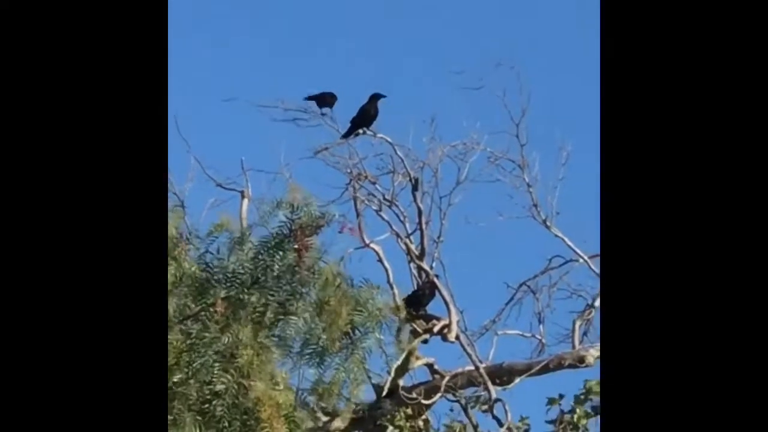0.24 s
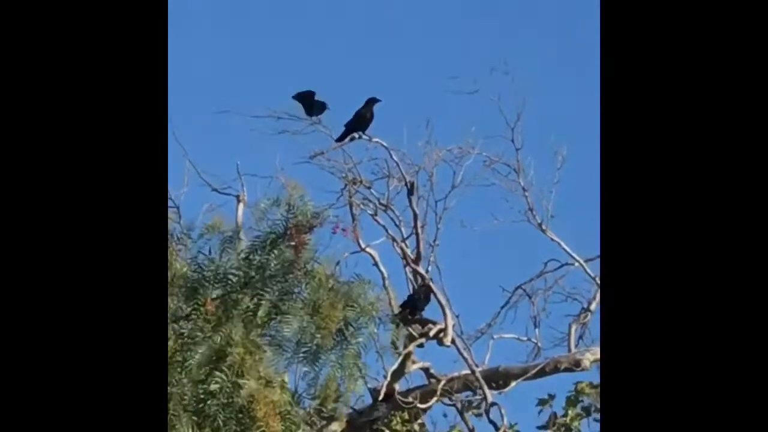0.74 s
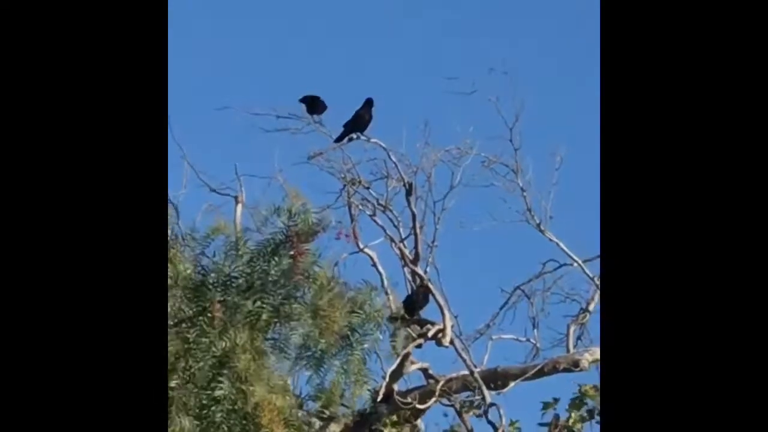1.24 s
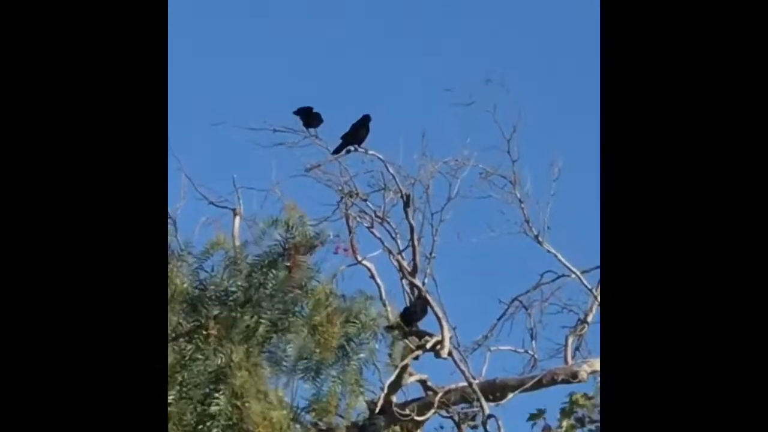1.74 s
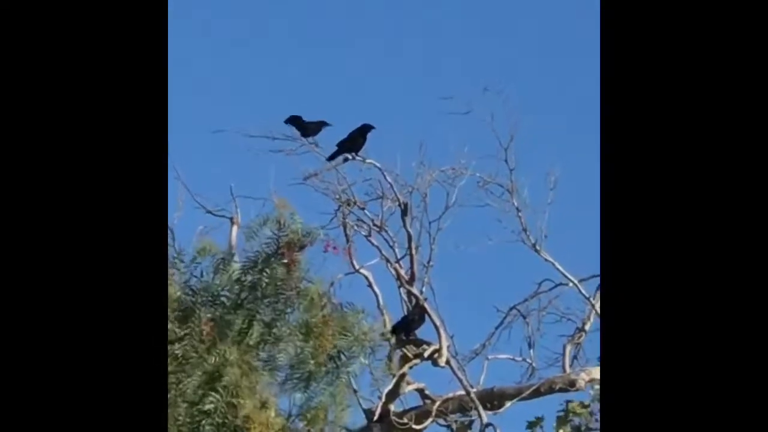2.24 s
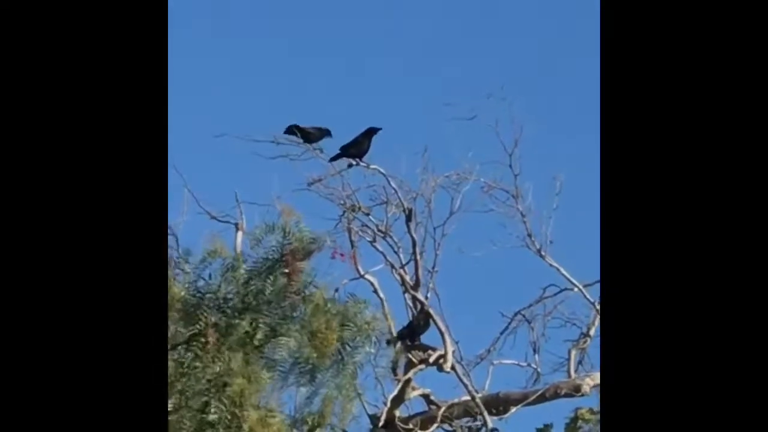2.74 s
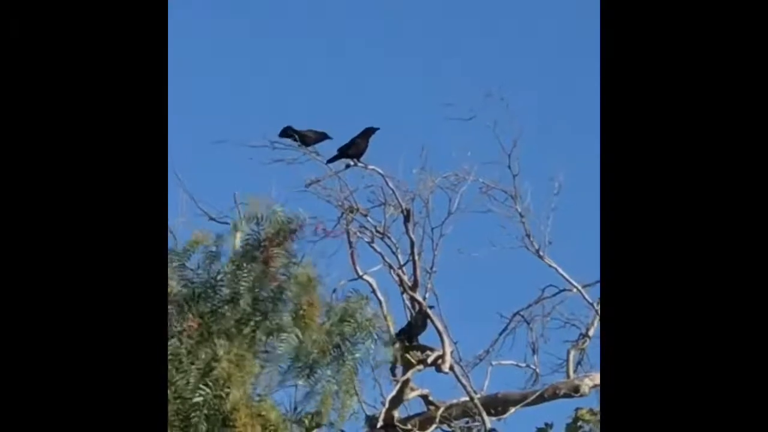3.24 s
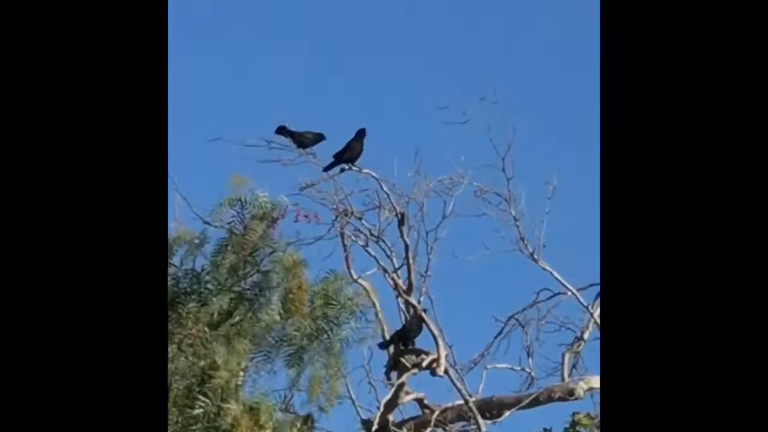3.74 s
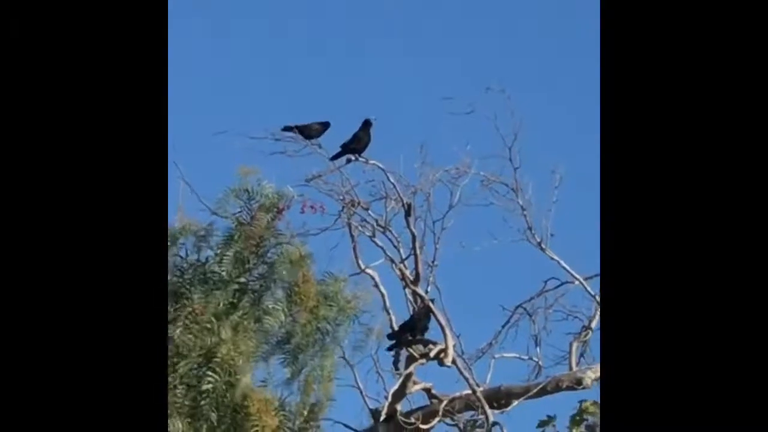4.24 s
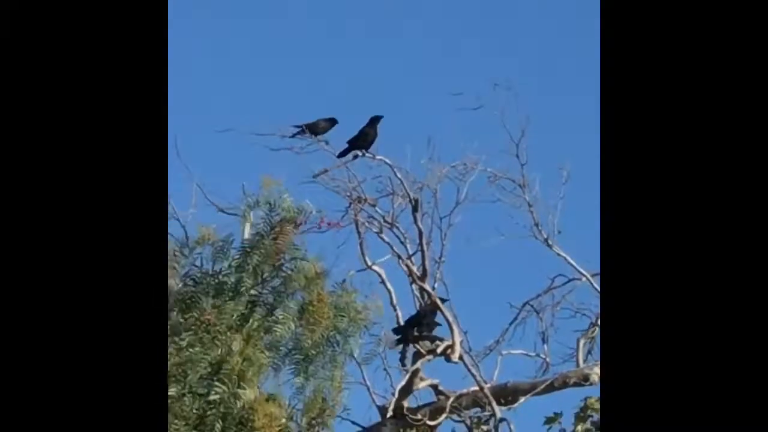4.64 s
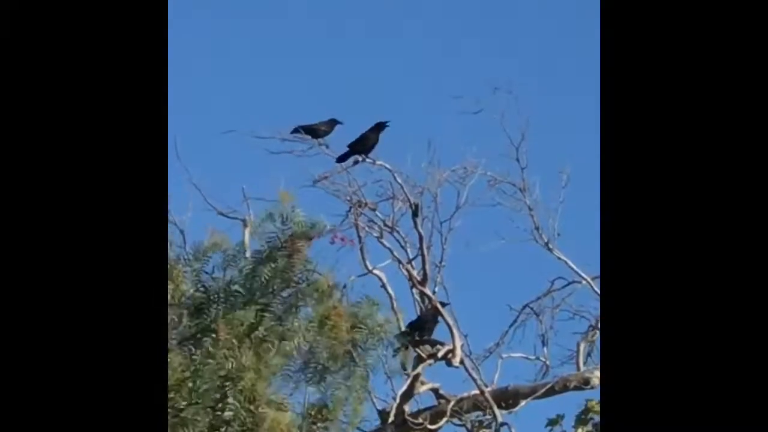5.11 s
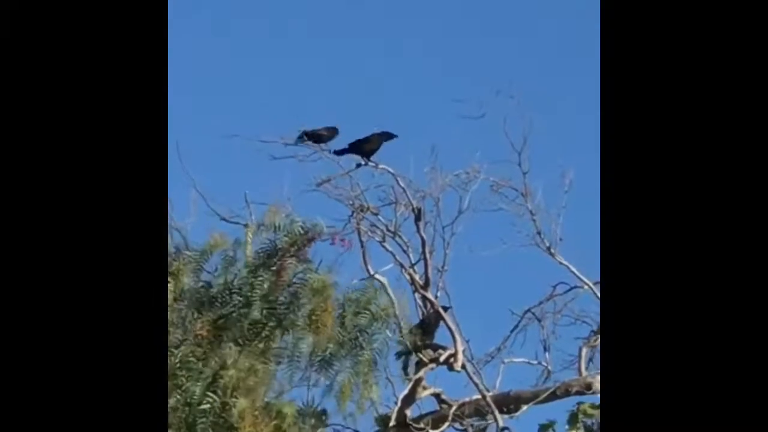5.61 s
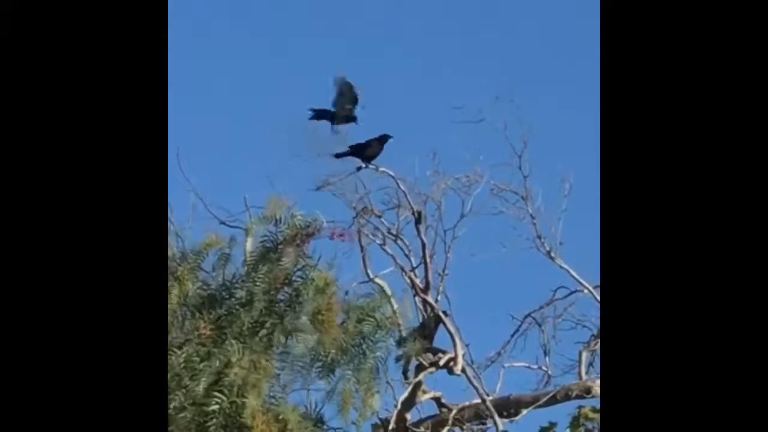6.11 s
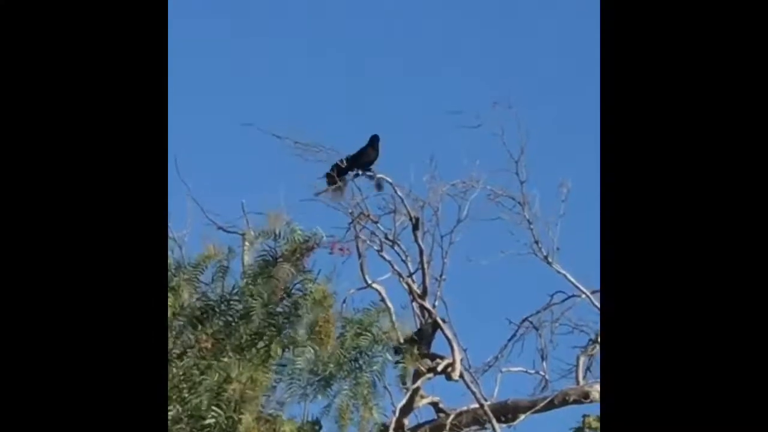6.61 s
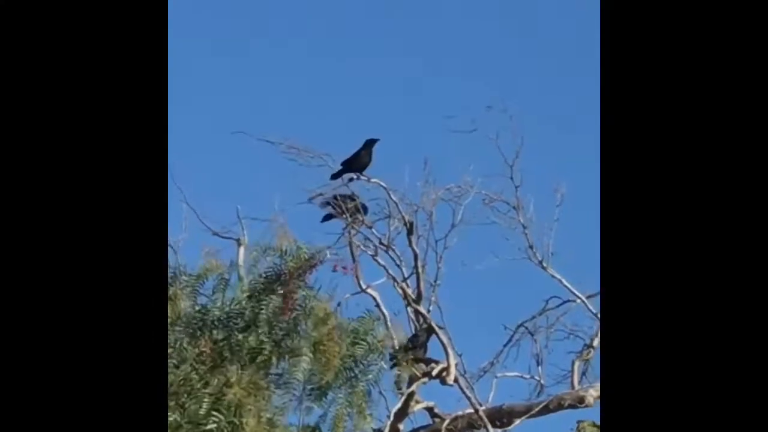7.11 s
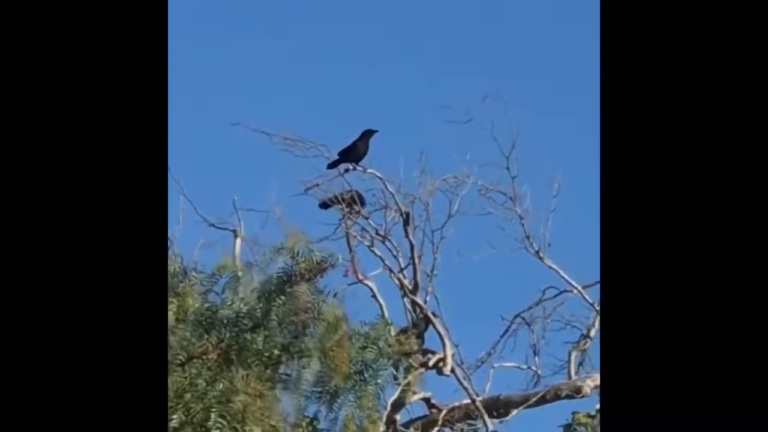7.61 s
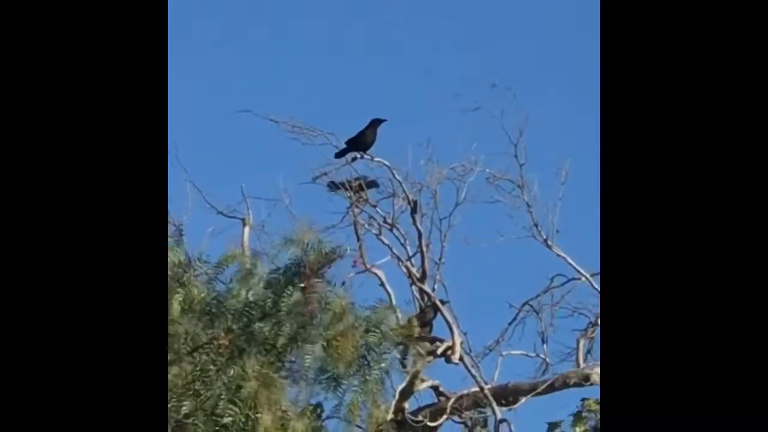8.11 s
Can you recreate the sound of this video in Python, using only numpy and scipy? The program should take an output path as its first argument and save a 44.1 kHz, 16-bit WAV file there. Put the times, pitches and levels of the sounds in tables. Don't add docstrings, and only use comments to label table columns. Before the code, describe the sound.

Outdoors, far crows call softly above rumbling traffic; after five seconds nearer crows caw harshly, wings clap, a rattle call clicks, and wind bumps the microphone.

```python
import sys
import numpy as np
from scipy import signal
from scipy.io import wavfile
from scipy.ndimage import uniform_filter1d

SR = 44100
rng = np.random.default_rng(int(sys.argv[2]) if len(sys.argv) > 2 else 0)


def gain_from_db(level_db):
    decades = np.asarray(level_db, float) / 20
    return 10 ** decades


def wav_out(sig):
    wavfile.write(sys.argv[1], SR, np.round(np.clip(np.atleast_2d(sig).T, -1, 1) * 32767).astype(np.int16))


N = 368676
T = np.arange(N) / SR

# start in seconds, length in seconds, effort in dB, top pitch in Hz, brightness in dB.
FAR_CAWS = [
    (.745, .19, -57, 670, 1),
    (1.11, .195, -56.5, 645, 0.5),
    (1.635, .19, -55.5, 659.4, 0),
    (2.22, .19, -56, 634, 0.5),
]
SHORT_CAWS = [
    (5.21, 0.16, -37, 635.7, 1.5),
    (5.52, 0.16, -37, 653, 0.5),
    (6.33, .195, -39.5, 528.2, -16),
    (7.066, .222, -36, 610.2, 3.5),
    (7.45, .16, -38.5, 639.3, -1),
    (7.8, 0.17, -40.5, 638, -0.5),
    (8.18, 0.17, -39.5, 640.6, -1.5),
]
LONG_CAWS = [
    (6.28, 0.35, -37, 620, 2.1),
    (6.862, .29, -35.5, 602, 0.16),
    (7.44, .38, -38, 598.4, 3),
]
# centre in Hz, width in Hz, level in dB.
NEAR_TRACT = [
    [(620, 550, -19.5), (1413, 400, 10.5), (1907, 450, 0)],
    [(2197, 440, 3.5), (2830, 310, -4), (3356, 490, 2)],
    [(3605, 320, 5.5), (4390, 470, -2.5)],
    [(4950, 1040, 0.5), (6400, 927, 5), (7175, 1200, -2), (8800, 1430, -11), (11500, 1700, -19)],
]
FAR_TRACT = [
    [(1426, 600, 0.83), (1910, 530, 1)],
    [(2235, 410, -4.5), (3240, 830, -6)],
    [(3680, 430, -9), (4450, 550, -10.5)],
    [(5150, 540, -4), (6140, 1150, 1), (7200, 2500, -11.5), (9000, 2500, -14.5)],
]
# crest and span as shares of the length, bend as exponent, climb and sag of pitch as
# shares, rise and fall of effort in dB, shift as exponent, mouth, beak and rasp in dB at the crest
# (open_db) and their change by the end in dB (end_db).
FAR_VOICE = dict(crest=.35, span=.5, bend=1.6, climb=.08, sag=.08, rise_db=-5, fall_db=-15, shift=1.4, open_db=[-3.5, -8.5, -4.5],
             end_db=[-12, 4, 2])
SHORT_VOICE = dict(crest=.42, span=.48, bend=2.6, climb=.32, sag=.28, rise_db=-13, fall_db=-5.5, shift=3.5, open_db=[-5.5, -10, -7.5],
               end_db=[-10.5, 1, -1])
LONG_VOICE = dict(crest=.27, span=.33, bend=1.5, climb=.28, sag=.3, rise_db=-7.5, fall_db=-8, shift=1.1, open_db=[-11, -18, -19.5],
              end_db=[-5, 11, 3])
# start in seconds, peak in dB.
RATTLE_KNOCKS = [(5.985, -53), (6.0457, -50), (6.105, -49.5), (6.1624, -46.5), (6.2244, -44.5),
                 (6.283, -42), (6.341, -46), (6.4, -49), (6.4597, -52), (6.6885, -49.5), (6.7497, -46),
                 (6.8088, -48.5), (6.868, -47)]
# centre in Hz, width in Hz, level in dB.
RATTLE_TRACT = [(1117.4, 180, 9.5), (1950, 800, -7), (4482, 92, 4.5), (6400, 470, 0), (7070, 460, 4),
                (7840, 580, -4), (9000, 630, -5), (11700, 2700, -14)]
# start in seconds, peak in dB, pitch in Hz.
WING_CLAPS = [(5.883, -43, 1410), (5.886, -47, 2148), (5.901, -43, 1300), (5.904, -43, 1610),
              (5.906, -43, 2240), (5.921, -41, 1500), (5.925, -45, 2150), (5.929, -47, 1670),
              (5.939, -46, 1870), (6.146, -45, 2000), (6.147, -53, 2700)]
# start in seconds, peak in dB, pitch in Hz, 60 dB decay in seconds.
TICKS = [
    (1.494, -41, 2300, .028),
    (1.494, -42.5, 6400, 0.011),
    (1.495, -54, 4200, .02),
    (1.511, -54, 5500, .0065),
    (1.538, -43.5, 1520, 0.017),
    (1.538, -50, 2315, .015),
    (1.548, -59, 2300, .015),
    (7.281, -43.5, 8800, .094),
    (7.283, -54, 8780, 0.24),
    (7.467, -49, 9000, 0.11),
]
# time in seconds, firing rate in Hz, first order in dB, share in plain line 0-1.
ENGINE_COURSE = [(0, 79.83, -41.5, 0), (.8, 80.3, -40, 0), (1.7, 80.1, -34.5, 0.06), (2.1, 80, -34.5, 0.53),
                 (2.6, 80.4, -33, 0.62), (3.25, 79.53, -32, 0.97), (3.8, 78.8, -32, 0.6),
                 (4.15, 80.16, -33.5, .15), (4.8, 79.8, -40, .25), (5.4, 80.04, -40.5, 0.01),
                 (6.1, 80.33, -41, 0.27), (6.6, 80.88, -49.5, 0.04), (7.8, 80.6, -47, .15),
                 (8.36, 81.14, -43, .35)]
# multiple of the firing rate, level hidden in dB, level in plain line in dB.
ENGINE_ORDERS = [(2, -80.5, -49.5), (3, -68.5, -50), (4, -70, -49), (5, -85.5, -61), (6, -89.5, -64.5)]
# centre in Hz, width in Hz, level in dB.
FAN = (119, 5.3, -52)
# peak time in seconds, peak in dB, width in seconds.
GUSTS = [(6.254, -34.5, 0.024), (6.42, -31, 0.055), (6.709, -25, 0.035), (6.785, -32, 0.016),
         (7.0, -31, 0.08), (7.272, -34.5, 0.044), (7.46, -34, 0.045), (7.62, -33, 0.069),
         (7.894, -34.5, 0.058), (8.13, -33.5, 0.047), (8.282, -35, 0.036)]
# time in seconds, peak in dB, pitch in Hz, length in seconds.
EDDIES = [
    (6.388, -22, 69, 0.0092),
    (6.384, -18.5, 140, 0.0015),
    (6.6775, -8, 82, 0.004),
    (6.675, -18.5, 196, 0.0021),
    (6.77, -30.5, 220, 0.0027),
    (7.027, -29, 140, 0.0046),
    (7.865, -31, 110, 0.0086),
]
# time in seconds, leaf hiss in dB, steady buffeting in dB.
BREEZE = [(0, -63.5, -42), (.9, -65, -53.5), (2.5, -66.5, -49), (4.2, -65, -47.5), (5.8, -60.5, -43.5),
          (6.1, -57.5, -48), (6.7, -60, -39.5), (8, -58, -43), (8.36, -62, -52)]
# frequency in Hz, level in dB per Hz.
BUFFET_COLOUR = [(8.8, -34), (15, 3), (49, 4), (66, 0), (97, -17), (162, -15.5), (222, -30), (312, -33),
                 (400, -36.5), (520, -72), (880, -120)]
# frequency in Hz, level in dB per Hz.
ROAR_COLOUR = [(12, -42), (20, -14.5), (59, 0), (86, -13), (105, -7), (188, -17.5), (320, -23), (426, -29),
               (556, -27), (990, -30), (2100, -43), (4000, -46.5), (5200, -76), (8800, -120)]
# frequency in Hz, level in dB per Hz.
HISS_COLOUR = [(880, -5), (1500, -6), (2090, -12), (2750, -11), (3870, -11.5), (4270, -11), (4900, -15),
               (5510, -13), (6770, -15.5), (7680, -18.5), (10700, -21.5), (13700, -24.5), (15700, -34)]

FLUTTER_HZ = 69.27
ONSET_S, RELEASE_S, RELEASE_DB = 0.02, 0.07, -59
SHUT_S, SHUT_DB = 0.015, -12
DRAWN_S = 0.212
FAR_ROUGH, SHORT_ROUGH, LONG_ROUGH = 0.58, 0.45, 0.37
STRAIN_DB, CLEAR_DB, CLEARING = -37, -41, 0.3
NOTE_DB, NOTE_FOLLOW = -45, 0.5
CLAP_T60_S = 0.024
KNOCK_ECHO_DB, TICK_ECHO_DB = -16, -26
BOOM_S, BOOM_RISE_S, BOOM_DB, BOOM_WANDER_DB = 5.95, 0.25, -53.5, 2.5
PASS_S, PASS_WIDTH_S, ROAR_DB, ROAR_SWELL_DB = 3.46, 0.7, -47, 3.5
SWISH_S, SWISH_WIDTH_S, SWISH_DB = 5.858, 0.018, -61.5


def evened(x):
    return x / np.sqrt(np.mean(x ** 2) + 1e-20)


def curve(rows):
    s, *columns = np.transpose(rows)
    return [np.interp(T, s, c) for c in columns]


def bell(s, width_s):
    return np.exp(-0.5 * ((T - s) / width_s) ** 2)


def drift(hz):
    return evened(signal.lfilter(*signal.butter(2, hz, fs=SR), rng.standard_normal(N)))


def noise(colour, patchy_db, size=2048):
    hz = np.fft.rfftfreq(size, 1 / SR)
    point_hz, point_db = np.transpose(colour)
    real, imag, patches = rng.standard_normal((4 * N // size + 5, len(hz), 3)).T
    patches = evened(uniform_filter1d(uniform_filter1d(patches, 16, 0), 8, 1))
    colour_db = np.interp(np.log(hz + 1), np.log(point_hz + 1), point_db, -100, -100)
    spectra = (real + 1j * imag) * gain_from_db(colour_db[:, None] + patchy_db * patches)
    return evened(signal.istft(spectra, nperseg=size, noverlap=3 * size // 4)[1][:N])


def resonate(x, hz, width_hz):
    pole = np.exp((2j * np.pi * hz - np.pi * width_hz) / SR)
    return 2 * signal.lfilter([(1 - abs(pole)) ** 2], [1, -2 * pole, pole ** 2], x).real


def tract(x, modes):
    return sum((-1) ** k * gain_from_db(db) * resonate(x, hz, width_hz) for k, (hz, width_hz, db) in enumerate(modes))


def gesture(caw, crest, span, bend, climb, sag, rise_db, fall_db, shift, open_db, end_db):
    start_s, length_s, db, top_hz, bright_db = caw
    s = np.arange(0, length_s + RELEASE_S, 1 / 200)
    share = s / length_s
    before = np.clip(1 - s / (crest * length_s), 0, 1) ** 2
    late = np.clip((share - crest) / (1 - crest), 0, 1)
    sunk = np.tanh((np.maximum(share - crest, 0) / span) ** bend)
    effort_db = db + rise_db * before + fall_db * late ** 2
    effort_db += RELEASE_DB * np.maximum(s - length_s, 0) / RELEASE_S
    hz = top_hz * (1 - climb * before - sag * sunk)
    shut_db = SHUT_DB * np.clip((s - length_s) / SHUT_S, 0, 1)
    groups_db = [bright_db + a + b * late ** shift + shut_db for a, b in zip(open_db, end_db)]
    return np.transpose([start_s + s, effort_db, hz, db + 0 * s, *groups_db])


def crow(caws, voice, groups, hoarse, flutter, jitter, clearing=0):
    rows = [gesture(c, **(voice if c[1] < DRAWN_S else LONG_VOICE)) for c in caws]
    effort_db, hz, strain_db, *groups_db = curve(np.concatenate(rows))
    gate = 0
    for start_s, length_s, *_ in caws:
        inside_s = np.minimum(T - start_s, start_s + length_s + RELEASE_S - T)
        gate = gate + np.clip(inside_s / ONSET_S, 0, 1)

    glide_hz_per_s = abs(np.gradient(uniform_filter1d(hz, size=1500))) * SR
    clear = np.interp(strain_db, [CLEAR_DB, STRAIN_DB], [1, 0])
    rough = np.clip(hoarse - clearing * clear + glide_hz_per_s / 24000, 0, 0.75)

    beat = 2 * np.pi * np.cumsum(FLUTTER_HZ * (1 + 0.1204 * drift(25.6))) / SR
    wobble = 1 + jitter * rough * drift(150) + 0.018 * np.sin(beat)
    turns = np.cumsum(uniform_filter1d(hz, size=500) * wobble) / SR
    pulses = np.sin(43 * np.pi * turns + 1e-9) / np.sin(np.pi * turns + 1e-9 / 43) - 1
    pulses *= 1 + 0.6 * rough * drift(250)
    puffs = (1.2 + np.exp(-(turns % 1) / 0.32)) * rng.standard_normal(N)
    drive = (1 - rough) * evened(pulses) + 0.7 * rough * evened(puffs)
    drive *= 1 + flutter * np.cos(beat)
    voiced = sum(gain_from_db(db) * evened(tract(drive, g)) for db, g in zip([0] + groups_db, groups))
    return gate * gain_from_db(effort_db) * voiced


def rattle():
    air, low, high = rng.standard_normal(N), np.zeros(N), np.zeros(N)
    for s, db in RATTLE_KNOCKS:
        u = np.maximum(T - s, 0)
        high += gain_from_db(db) * (1 - np.exp(-u / 0.00074)) * np.exp(-u / 0.013)
        low += gain_from_db(NOTE_DB + NOTE_FOLLOW * (db + 54)) * u / 0.0049 * np.exp(1 - u / 0.0059)
    note = low * evened(tract(air, RATTLE_TRACT[:2]))
    rasp = high * evened(tract(air, RATTLE_TRACT[2:]))
    return gain_from_db(-6) * (note + rasp)


def ticks():
    out = np.zeros(N + SR)
    u = np.arange(SR // 2) / SR
    click = 1 - np.exp(-u / 0.000066)
    for s, db, hz, t60_s in TICKS + [(*clap, CLAP_T60_S) for clap in WING_CLAPS]:
        decay = gain_from_db(db - np.minimum(60 * u / t60_s, 200))
        out[round(s * SR):][:len(u)] += decay * np.cos(2 * np.pi * hz * u) * click
    return out[:N]


def yard(x, t60_s, gap_s):
    at = np.arange(round(gap_s * SR), SR // 2, 20)
    taps = np.zeros(SR // 2 + 20)
    signs = rng.choice([-1., 1.], len(at))
    taps[at + rng.integers(0, 20, len(at))] = signs * gain_from_db(-60 * at / SR / t60_s)
    taps = signal.lfilter([1], [1, -0.7], taps)
    return signal.oaconvolve(x, taps / np.linalg.norm(taps))[:N]


def drone():
    hz, first_db, in_line = curve(ENGINE_COURSE)
    phase = 2 * np.pi * np.cumsum(hz * (1 + 0.0037 * drift(2.94))) / SR
    orders = [(0.99, first_db)] + [(k, a + (b - a) * in_line) for k, a, b in ENGINE_ORDERS]
    tones = sum(gain_from_db(db + 0.42 * np.sqrt(k) * drift(5.2)) * np.sin(k * phase) for k, db in orders)
    boom_rise = np.clip((T - BOOM_S) / BOOM_RISE_S, 0, 1)
    tones += gain_from_db(BOOM_DB + BOOM_WANDER_DB * drift(1.38)) * boom_rise * np.sin(2 * phase)
    fan_hz, fan_width_hz, fan_db = FAN
    fan = gain_from_db(fan_db) * evened(resonate(rng.standard_normal(N), fan_hz, fan_width_hz))
    return np.sqrt(2) * tones + fan


def wind():
    push = gain_from_db(curve(BREEZE)[1]) + sum(gain_from_db(db) * bell(s, width_s) for s, db, width_s in GUSTS)
    out = push * gain_from_db(0.94 * drift(35)) * noise(BUFFET_COLOUR, 0.76)
    for s, db, hz, length_s in EDDIES:
        out += gain_from_db(db) * bell(s, length_s) * np.sin(2 * np.pi * hz * (T - s))
    return out


def wash():
    feathers = evened(resonate(rng.standard_normal(N), 10500, 7000))
    swish = gain_from_db(SWISH_DB) * bell(SWISH_S, SWISH_WIDTH_S) * feathers
    roar = gain_from_db(ROAR_DB + ROAR_SWELL_DB * bell(PASS_S, PASS_WIDTH_S)) * noise(ROAR_COLOUR, 0.95)
    hiss = gain_from_db(curve(BREEZE)[0]) * noise(HISS_COLOUR, 1.0, size=1024)
    return roar + hiss + swish


def scene():
    far = crow(FAR_CAWS, FAR_VOICE, FAR_TRACT, FAR_ROUGH, flutter=0.25, jitter=0.045)
    short = crow(SHORT_CAWS, SHORT_VOICE, NEAR_TRACT, SHORT_ROUGH, flutter=0.24, jitter=0.055, clearing=CLEARING)
    long = crow(LONG_CAWS, LONG_VOICE, NEAR_TRACT, LONG_ROUGH, flutter=0.33, jitter=0.055)
    near, knocks, small = short + long, rattle(), ticks()
    far_echo = gain_from_db(-5.5) * yard(far, 0.55, 0.02)
    near_echo = gain_from_db(-9.5) * yard(near + gain_from_db(TICK_ECHO_DB + 13) * small, 0.27, 0.015)
    knock_echo = gain_from_db(KNOCK_ECHO_DB) * yard(knocks, 0.24, 0.011)
    birds = far + far_echo + near + near_echo + knocks + knock_echo + small
    return (birds + drone() + wind() + wash())[None]


def band_limit(x):
    return signal.sosfilt(signal.butter(12, 15690, fs=SR, output="sos"), x)


def record(dry):
    return band_limit(dry)


dry = scene()
out = record(dry)
wav_out(out)
```